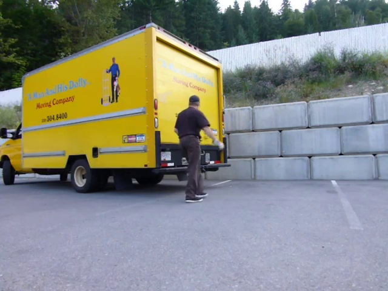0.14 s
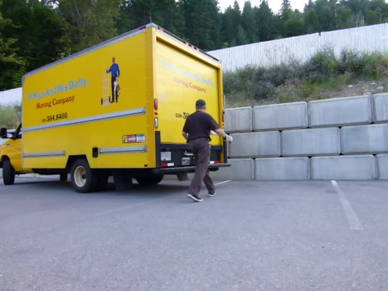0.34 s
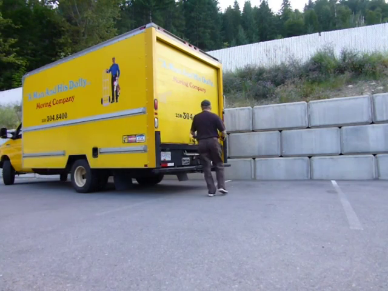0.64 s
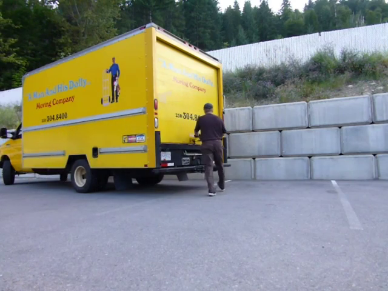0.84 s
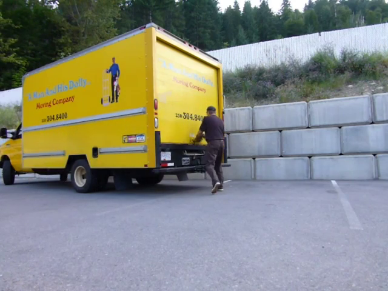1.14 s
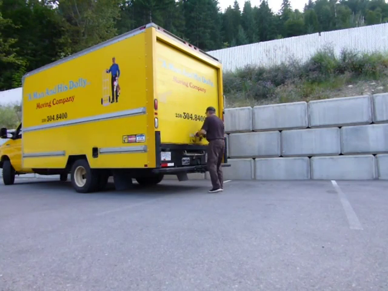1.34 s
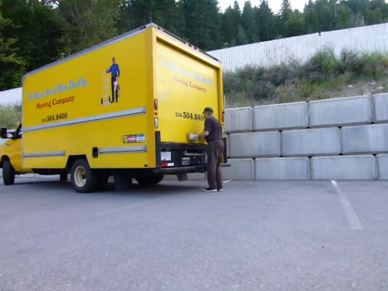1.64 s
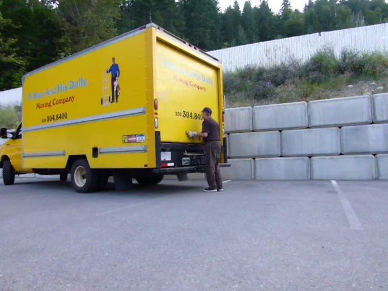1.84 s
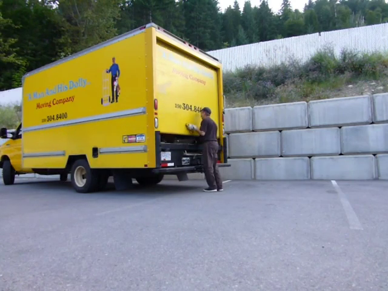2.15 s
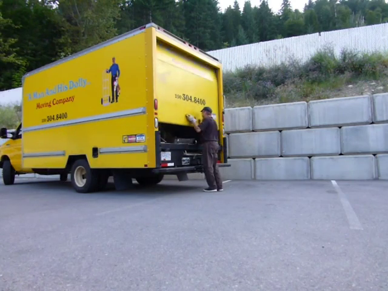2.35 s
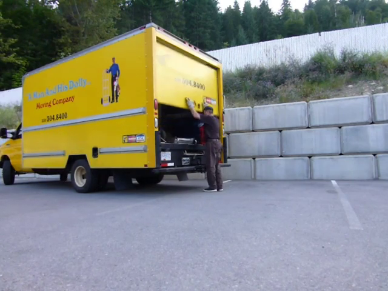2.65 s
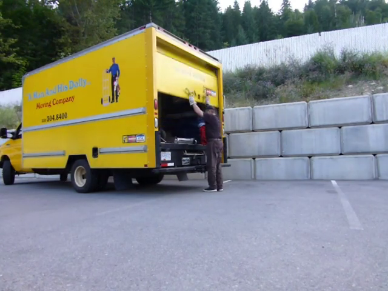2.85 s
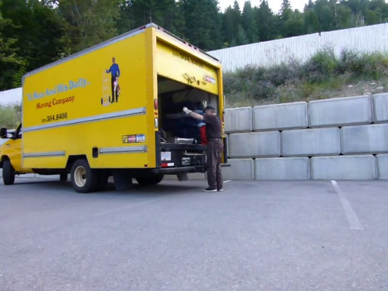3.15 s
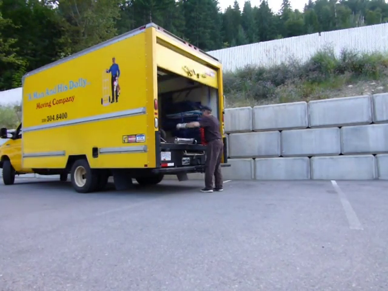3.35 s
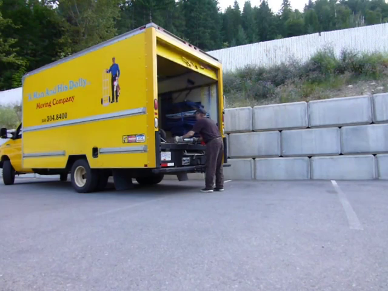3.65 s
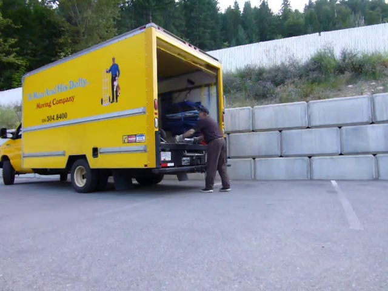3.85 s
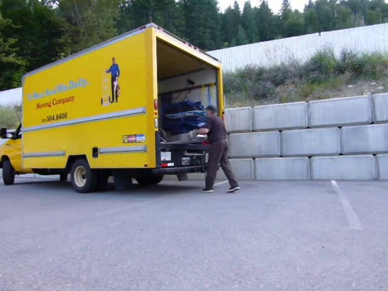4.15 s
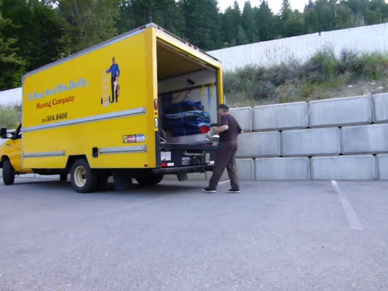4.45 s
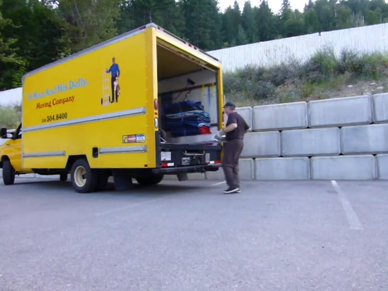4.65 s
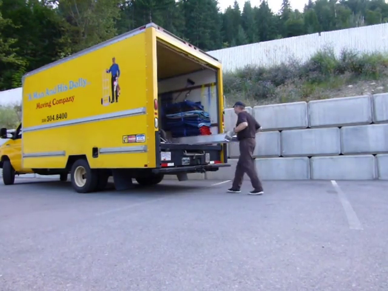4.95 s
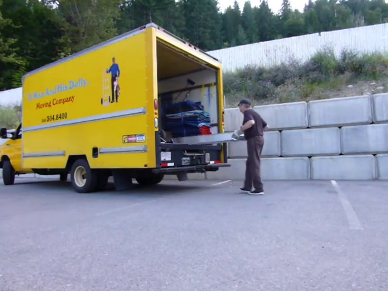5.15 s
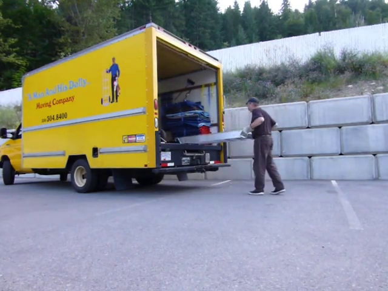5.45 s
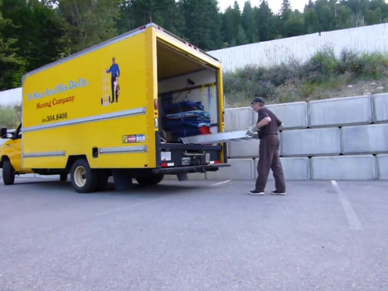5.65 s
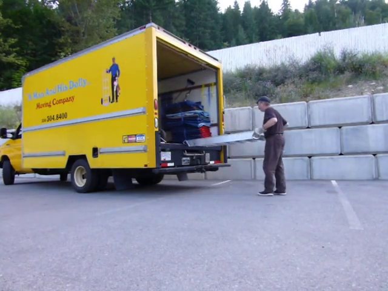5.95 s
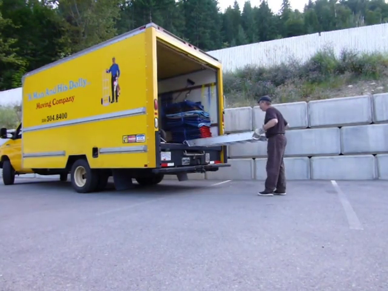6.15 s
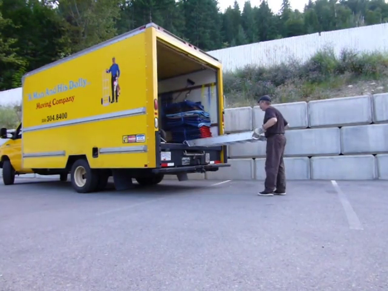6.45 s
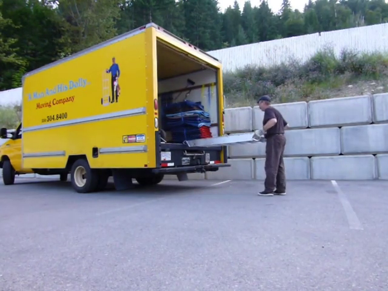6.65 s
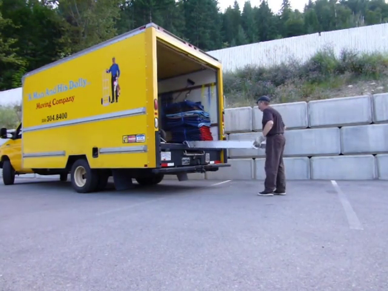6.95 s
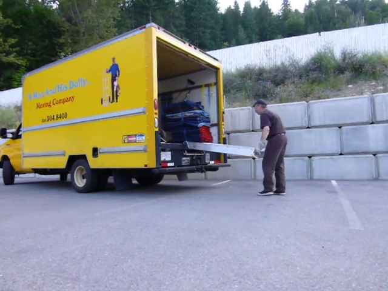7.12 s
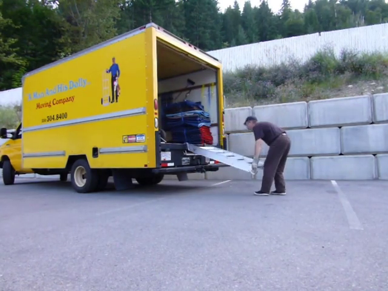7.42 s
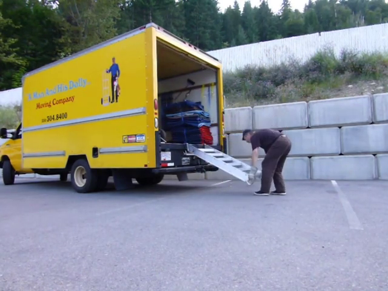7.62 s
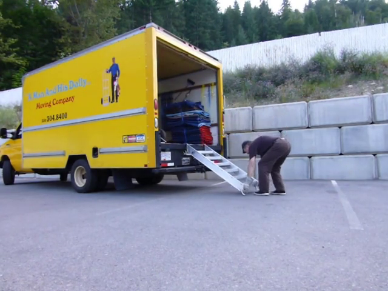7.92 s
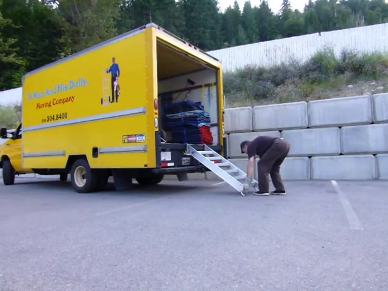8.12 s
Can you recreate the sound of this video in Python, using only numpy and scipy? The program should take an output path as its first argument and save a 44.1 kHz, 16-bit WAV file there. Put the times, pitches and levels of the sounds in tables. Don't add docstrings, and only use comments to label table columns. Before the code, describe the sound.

A steel latch clatters loose, a slatted truck door rattles up its tracks, then a metal ramp drones out, clangs hard and is set down outdoors.

```python
import sys
import numpy as np
from scipy import signal
from scipy.fft import rfft, irfft, next_fast_len
from scipy.io import wavfile

SR = 44100
rng = np.random.default_rng(int(sys.argv[2]) if len(sys.argv) > 2 else 0)


def digitize_waveform(pressure):
    field = np.atleast_2d(pressure).T
    bounded = np.clip(field, -1, 1)
    quanta = np.round(bounded * 32767).astype(np.int16)
    wavfile.write(sys.argv[1], SR, quanta)


def rack_gain(trim_db):
    fader = np.asarray(trim_db, float)
    return 10 ** (fader / 20)


N = 365148

# t/s, level/dB, weight/dB, hard edge/dB, contact time/s
RAMP_BLOWS = [(5.3433, -28.5, 7, -12, 0.012), (5.432, -17, 6.5, -16, 0.062), (5.471, -8.5, 3.5, -16, 0.034),
              (5.5518, -13.5, 5.5, -12, 0.052), (5.6051, -13.5, 8, -13, 0.014),
              (5.6193, -10, -7, -11.5, 0.014), (5.6315, -13.5, 5.5, -14, 0.015),
              (5.6494, -13, -4, -12, 0.056), (5.6995, -14, 8, -16, 0.15), (5.9292, -7.5, -1, -14.5, 0.004),
              (5.9483, -9.5, 4, -5, 0.0048), (6.0125, -13, 3, -6, 0.011), (6.0385, -17, 2.5, -8, 0.029),
              (6.5589, -21, 2, -17.5, 0.023), (6.684, -33.5, 13, -15, 0.023), (6.7192, -42, 22, -31, 0.035),
              (7.3065, -13, 3, -12.5, 0.047), (7.335, -21, 6, -12, 0.016), (7.3691, -14.5, 0.5, -7, 0.014),
              (7.3849, -14.5, -2.5, -22, 0.018), (8.096, -18.5, 5.5, -11.5, 0.02),
              (8.112, -12, -2.5, -12, 0.0069), (8.1277, -19.5, 4, -28, 0.0045)]
# t/s, speed level/dB, load on the rollers/dB
RAMP_ROLL = [(3.92, -48, 0), (3.965, -40.5, 16), (4.0, -28, 9.5), (4.03, -23.5, 5.5), (4.125, -15.5, 1.5),
             (4.18, -13, -3.5), (4.43, -21, 0.5), (4.55, -20, 0.5), (4.592, -26, -2), (4.63, -19.5, -2),
             (4.73, -27.5, -1), (4.844, -28.5, 4), (4.942, -24, 5), (5.062, -36, -3), (5.146, -37.5, -5),
             (5.206, -30, 1.5), (5.376, -31.5, -6), (5.42, -39, 3)]
# t/s, level/dB
GRIT = [
    (3.997, -37),
    (4.041, -42),
    (4.165, -48),
    (4.626, -53),
    (4.685, -45),
    (4.77, -51),
    (4.931, -46),
    (5.04, -45),
]
# landing t/s, level/dB
SCUFFS = [
    (6.555, -33),
    (7.304, -27.5),
]
# offset level/dB, share [1]
RAMP_LOWS = [(-1.5, 0.85), (1, 0.76)]
GRIT_LOWS = [(-37, 0), (-30, 0)]
# offset level/dB, share [1]
RAMP_FOLLOWS = [(-23.5, 0.85), (-23.5, 0.81), (-31.5, 0.8), (-53.5, 1)]
# f/Hz, level/dB per Hz
RAMP_COLOUR = [(29, -63), (50, -24), (144, -11), (394, -6), (652, -10.5), (829, -8.5), (981, -12),
               (1700, -17), (1970, -21), (7190, -35), (10100, -45), (15500, -94)]
# f/Hz, level/dB per Hz
HELD_COLOUR = [(35, -60), (60, -20.5), (150, -15.5), (300, -3), (550, -1.5), (1000, -5), (1600, -20),
               (2500, -25.5), (4300, -32), (6000, -41), (10000, -44), (14000, -54), (15500, -68)]
# f/Hz, t60/s
RAMP_T60 = [(100, 0.74), (300, 1), (800, 0.75), (2000, 0.54), (5000, 0.47), (12000, 0.23)]
HELD_T60 = [(200, 0.23), (1000, 0.23), (5000, 0.054)]
# f/Hz, level over the dense modes/dB, t60/s
RAMP_MODES = [(250, -16, .7), (310, -17, .6), (390, -14, .8), (580, -17, .5), (670, -19, .4),
              (810, -20, .5), (840, -20, .5), (975, -21, .4)]
HELD_MODES = [(250.5, -9, 0.32), (289, -7.5, 0.3), (316.5, -7, 0.37), (448, -12, 0.16),
              (635.7, -10.5, 0.21), (795, -12, 0.33)]

# t/s, level/dB, weight/dB, hard edge/dB
DOOR_BLOWS = [(2.1036, -16.5, 3, -12), (2.154, -22.5, -12, -5), (2.2095, -18, 4.5, -3),
              (2.4028, -25, 17, -11), (2.4454, -16.5, 3, -6), (2.4863, -18.5, 7, 1), (2.5487, -25, 2, 1),
              (2.639, -12, 3, -13), (2.6446, -7, 7.5, -21), (2.797, -10, -3, -6), (2.8152, -6.5, -15, -23),
              (2.9532, -4, 2, -10), (2.9824, -1.5, 3, -16), (3.1474, -9, -19, -11), (3.1646, -5, -6, -11),
              (3.2015, -9.5, 5.5, -6.5), (3.2675, -22, 0, 1.5), (3.4324, -8.5, -1, -10.5),
              (3.4484, -15, 2, -7), (3.5471, -9.5, -20, -11), (3.579, -18.5, -16, -2),
              (3.6127, -11, -18, -3), (3.7244, -7, -14, -2.5)]
# t/s, speed level/dB
DOOR_ROLL = [(1.95, -56), (2.17, -40), (2.29, -33.5), (2.39, -35.5), (2.53, -29), (2.65, -31), (2.84, -25),
             (3.04, -24), (3.23, -33), (3.46, -31), (3.64, -31), (3.83, -31), (4.0, -44)]
# offset level/dB, share [1]
DOOR_LOWS = [(-11.5, 1), (-1.5, 0.99)]
# offset level/dB, share [1]
DOOR_FOLLOWS = [(-29.5, 0.62), (-28.5, 0.85), (-33.5, 0.8), (-42, 0.74)]
# f/Hz, level/dB per Hz
DOOR_COLOUR = [(35, -52), (60, -11), (192, 4.5), (464, -1), (657, 0.5), (1230, -12.5), (3580, -20.5),
               (4030, -23.5), (4420, -21.5), (5320, -27), (14100, -44), (15500, -58)]
# f/Hz, t60/s
DOOR_T60 = [(200, 0.26), (1000, 0.59), (4000, 0.3), (12000, 0.35)]
# f/Hz, level over the dense modes/dB, t60/s
DOOR_MODES = [(188.4, -18, 0.65), (314, -31, 0.38), (393.2, -11, 0.36), (652, -10.5, 0.54),
              (4037, -15.5, 0.035), (4830, -11, 0.033)]

# t/s, level/dB, weight/dB, hard edge/dB
LATCH_BLOWS = [(1.063, -16.5, -7.5, 0.5), (1.0946, -11, -21, -1.5), (1.1398, -27, -20, 3),
               (1.186, -23, -13, -10), (1.2161, -11.5, -20, -12), (1.2254, -24, -25, -16),
               (1.262, -17, -9, -17), (1.297, -3, -22, -9), (1.3457, -20, -8, -4), (1.3874, -16, -15, -11),
               (1.4345, -9, 1, -5.5), (1.4474, -9, -12, -7), (1.4646, -13, -10, -3.5),
               (1.5235, -17, -17, -14), (1.5889, -10.5, -12, 0.5), (1.6044, -36, -22, 4),
               (1.6644, -14.5, -27, -2), (1.712, -9, -7, -7.5), (1.7244, -17, 1, -17),
               (1.7399, -20, 1.5, -5), (1.767, -18, -18, -5), (1.8216, -18, -20, -14),
               (1.8318, -8.5, -32, -2.5), (1.8494, -15, 5, 0), (1.921, -21.5, -20, -29)]
# t/s, level/dB
JIGGLE = [(1.04, -47), (1.07, -37), (1.3, -41), (1.6, -35), (1.9, -31.5), (2.02, -44.5)]
# offset level/dB, share [1]
LATCH_LOWS = [(0.16, 0.83), (-0.41, 0.21)]
# f/Hz, level/dB per Hz
LATCH_COLOUR = [(70, -36), (150, -8), (330, 3), (900, -5), (1480, 2), (2200, -6), (3000, -4), (3600, -12.5),
                (5500, -10), (8000, -17), (12000, -24), (15500, -58)]
# f/Hz, t60/s
LATCH_T60 = [(200, 0.29), (1000, 0.23), (4000, 0.18), (12000, 0.066)]
# f/Hz, level over the dense modes/dB, t60/s
LATCH_MODES = [(1450, -12, .04), (3000, -14, .05), (4080, -19, .1), (5600, -12, .1), (7400, -19, .1),
               (7950, -19, .09), (9050, -21, .08), (10010, -24, .08), (11200, -23, .09)]

# t/s, f/Hz,
# level/dB, t60/s
RINGS = [(1.589, 7301, -25, .2), (1.589, 7705, -24, .2), (1.742, 5600, -26, .06), (2.104, 5300, -11, .012),
         (2.104, 6200, -15, .01), (2.157, 5600, -28, .015), (1.6644, 7700, -27, .06),
         (4.176, 5170, -24, .06), (4.156, 4670, -29, .04), (2.9835, 1500, -7, .012), (3.613, 3910, -30, .1),
         (3.724, 3910, -20, .12), (3.724, 5400, -24, .1), (4.765, 4900, -42, .05)]
# t/s, f/Hz, width/Hz, level/dB,
# t60/s
SQUEAKS = [(0.866, 270, 130, -29, .25), (4.155, 5210, 140, -29, .5), (4.165, 4950, 250, -33, .3),
           (1.435, 350, 120, -21, .3), (1.09, 270, 80, -31, .3), (4.628, 3950, 220, -36, .38),
           (3.57, 14300, 700, -50, .9), (3.98, 14300, 700, -52, 1.2), (2.755, 700, 50, -16, .3),
           (7.235, 650, 120, -38, .4), (8.108, 860, 240, -12, .36), (6.01, 850, 110, -17, .7),
           (4.865, 300, 60, -18, .3), (4.93, 310, 60, -15, .3), (3.985, 305, 40, -16, .5),
           (4.07, 285, 50, -17, .5), (4.38, 330, 30, -20, .6), (4.53, 420, 40, -17, .35),
           (0.866, 750, 400, -39.5, .12), (5.436, 500, 500, -25, .3), (6.682, 380, 150, -29, .4),
           (7.34, 600, 150, -17, .5)]
# t/s, f/Hz, level/dB
CATCH_KNOCKS = [(1.063, 1410.0, -26), (1.063, 5530.0, -17), (1.0946, 4640.0, -18), (1.0946, 5160.0, -17),
                (1.0946, 5560.0, -13), (1.0946, 6060.0, -20.0), (1.2161, 2750.0, -20),
                (1.2254, 1360.0, -21), (1.2254, 3280.0, -30), (1.262, 3050.0, -25.0), (1.262, 4530.0, -27),
                (1.262, 5570.0, -20), (1.297, 1300.0, -6.5), (1.297, 4090.0, -10), (1.297, 4750.0, -14),
                (1.297, 6080.0, -15), (1.3874, 2880.0, -27), (1.4345, 1530.0, -12), (1.4345, 3880.0, -19),
                (1.4345, 5640.0, -25.0), (1.4345, 6380.0, -25.0), (1.4646, 1510.0, -24),
                (1.4646, 2810.0, -22), (1.4646, 4680.0, -34), (1.5889, 1500.0, -12), (1.5889, 2900.0, -22),
                (1.5889, 4820.0, -29), (1.6044, 3430.0, -24), (1.6044, 5710.0, -24), (1.6644, 1660.0, -25),
                (1.6644, 6470.0, -30.0), (1.712, 1510.0, -13), (1.712, 4010.0, -23.0), (1.712, 5590.0, -30),
                (1.712, 6380.0, -35), (1.7244, 2770.0, -28.0), (1.7244, 4030.0, -25),
                (1.767, 1750.0, -19.5), (1.8216, 1480.0, -19.0), (1.8216, 3080.0, -31),
                (1.8216, 4110.0, -31.0), (1.8318, 1550.0, -15), (1.8318, 3130.0, -12.5),
                (1.8318, 4120.0, -14.5), (1.8318, 6320.0, -26), (1.8494, 2900.0, -25.5),
                (1.8494, 4150.0, -24), (1.8494, 6290.0, -34.5), (1.8494, 6810.0, -33.5),
                (1.921, 2820.0, -24.5)]
# t/s, f/Hz, level/dB
PIN_TINKS = [(1.063, 9100, -28), (1.063, 10010.0, -33.0), (1.063, 11200.0, -39), (1.0946, 9050.0, -28),
             (1.0946, 11190.0, -31), (1.0946, 15090.0, -44.0), (1.2161, 11540.0, -51.0), (1.297, 7250, -21),
             (1.297, 9070.0, -40), (1.297, 10000.0, -34), (1.3874, 10850.0, -44), (1.3874, 13980.0, -50),
             (1.3874, 15260.0, -55.0), (1.4345, 8000, -24), (1.4345, 10900.0, -33), (1.4345, 15020.0, -46),
             (1.4646, 7430.0, -28), (1.4646, 8050.0, -37.0), (1.4646, 10070.0, -42), (1.5889, 14310.0, -30),
             (1.6644, 10650.0, -36), (1.712, 7430.0, -39.0), (1.767, 13100.0, -44), (1.767, 14400, -36),
             (1.767, 15600.0, -55.0), (1.8318, 8560.0, -35), (1.8494, 7260, -27), (1.8494, 11460.0, -47)]
# t/s, f/Hz, level/dB
ROLLER_TICKS = [(2.213, 2270.0, -28), (2.45, 3980.0, -26), (2.462, 5300, -25), (2.489, 4060.0, -33.0),
                (2.492, 4800, -32), (2.546, 3530.0, -28), (2.546, 5320.0, -33.0), (2.612, 4120.0, -32.0),
                (2.624, 3450, -26), (2.639, 5220, -29), (2.645, 6060.0, -27), (2.78, 4130.0, -32.0),
                (2.792, 5070, -22), (2.801, 2400, -19), (2.801, 4720.0, -16), (2.843, 3980.0, -28),
                (2.861, 1800.0, -27), (2.927, 3830.0, -25.0), (2.93, 4040, -28.0), (2.939, 7030.0, -27),
                (2.957, 4830.0, -30.0), (2.978, 3880.0, -22), (2.981, 2350.0, -18.0), (2.984, 6100, -21),
                (2.987, 1360, -14.5), (2.996, 1690, -18), (2.996, 4900, -19), (3.152, 2370.0, -18),
                (3.152, 5390.0, -23), (3.161, 2780, -17), (3.185, 4020, -25), (3.2, 3190.0, -25.0),
                (3.221, 2760.0, -23), (3.242, 4100, -32.0), (3.263, 5330.0, -31), (3.38, 2970.0, -30.0),
                (3.431, 5970.0, -30.0), (3.47, 4040.0, -34), (3.545, 6150.0, -38), (3.548, 8560.0, -26)]
# t/s, f/Hz, level/dB
GRIT_FLECKS = [(3.992, 7500, -35), (4.0, 13960.0, -47.0), (4.004, 9000.0, -37.0), (4.08, 3910.0, -29.5),
               (4.14, 13860.0, -51.0), (4.168, 10730.0, -36), (4.18, 13810.0, -53.0),
               (4.212, 9130.0, -46.0), (4.272, 3920.0, -30), (4.336, 8900, -44), (4.348, 10820.0, -50.0),
               (4.532, 11530.0, -51), (4.628, 3940, -30), (4.628, 8000.0, -39), (4.672, 3890.0, -39),
               (4.832, 9880.0, -53.0)]
# t/s, f/Hz, level/dB
PLATE_CLANGS = [(5.485, 820, -10.5), (5.495, 576, -17), (5.51, 904, -21), (5.525, 1050, -20),
                (5.53, 766, -16.0), (5.56, 397, -7.5), (5.565, 1200.0, -17), (5.575, 470.0, -10.0),
                (5.59, 1580, -19), (5.6, 574, -16.0), (5.6, 1400, -18), (5.615, 1320.0, -24),
                (5.65, 810, -22), (5.66, 593, -17), (5.68, 1510, -18), (5.945, 1160, -16.5),
                (5.97, 730, -27), (5.99, 920.0, -13.5), (6.02, 829, -12.5), (6.11, 830, -17)]

# f/Hz, level/dB per Hz
TRAFFIC_COLOUR = [(22, -14.5), (35, -15), (60, -41), (120, -2.5), (250, -2), (500, -4.5), (800, -7.5),
                  (1600, -18.5), (2500, -22.5), (3300, -29.5), (4900, -24.5), (6300, -30.5), (10000, -35),
                  (13200, -41), (14500, -61)]
# t/s, level/dB
TRAFFIC_LEVEL = [(0, -42), (1.0, -41), (5.3, -37.5), (6.3, -45.5), (7.15, -47), (7.35, -42), (7.9, -45.5),
                 (8.28, -45)]
# f/Hz, side re mid level/dB
TRUCK_WIDTH = [(60, -14), (150, -26), (380, -29), (950, -17), (2380, -13), (5980, -14), (15000, -14)]
TRAFFIC_WIDTH = [(30, -12), (70, -27), (180, -35), (550, -12), (1650, -2.5), (4970, -4.5), (15000, 1)]
# f/Hz, left re right level/dB
LEAN = [(60, 0), (240, -0.5), (950, -1), (3770, 0), (15000, 4)]
SPLIT_HZ = (450, 1200, 4500)
EDGES_HZ = 22 * 2 ** np.arange(0, 9.7, 1 / 3)
SPOTS, NEAR = 6, 3


def rms_one(x):
    return x / np.sqrt(np.mean(x ** 2) + 1e-20)


def at_hz(points, hz):
    table_hz, values = np.array(points).T
    return np.interp(np.log(hz), np.log(table_hz), values)


def controls(rows, outside_db=-400):
    s, *columns = np.transpose(rows)
    t = np.arange(N) / SR
    return [np.interp(t, s, c, left=outside_db, right=outside_db) for c in columns]


def in_time(rows):
    return rack_gain(np.array(controls(rows, outside_db=-200)))


def follow(control_db, rule):
    return rack_gain(np.array([offset_db + share * control_db for offset_db, share in rule]))


def drift(rate_hz):
    knots = rng.standard_normal(int(N / SR * rate_hz) + 2)
    return rms_one(np.interp(np.arange(N) / SR * rate_hz, np.arange(len(knots)), knots))


def onset(t, rate):
    return 1 - np.exp(-rate * t)


def bands(size, colour, width):
    white = rng.standard_normal((2, 2, size))
    for k, (low, high) in enumerate(zip(EDGES_HZ, EDGES_HZ[1:])):
        band_pass = signal.butter(2, [low, high], "band", fs=SR, output="sos")
        mid, side = signal.sosfilt(band_pass, white[k % 2])
        hz = np.sqrt(low * high)
        lean = rack_gain(at_hz(LEAN, hz) / 2 * np.array([[1], [-1]]))
        stereo = mid + rack_gain(at_hz(width, hz)) * side * [[1], [-1]]
        yield hz, rack_gain(at_hz(colour, hz)) * lean * stereo


def body(colour, decays, modes, crack_db, crack_s, seconds):
    size = round(seconds * SR)
    t = np.arange(size) / SR
    parts = np.zeros((4, 2, SPOTS, size))
    for hz, band in bands(size * SPOTS, colour, TRUCK_WIDTH):
        dying = rack_gain(-60 * t / at_hz(decays, hz)) + rack_gain(crack_db - 60 * t / crack_s)
        building = onset(t, 2 * hz) ** 2
        parts[np.searchsorted(SPLIT_HZ, hz)] += band.reshape(2, SPOTS, size) * building * dying
    parts /= np.sqrt(np.sum(parts ** 2, axis=(1, 2, 3), keepdims=True) / 2 / SPOTS)
    for hz, level_db, t60 in modes:
        mode = np.sin(2 * np.pi * hz * t) * rack_gain(-60 * t / t60) * onset(t, 2 * hz)
        shape = rng.standard_normal((SPOTS, 1))
        mode = mode / np.sqrt(np.sum(mode ** 2))
        parts[np.searchsorted(SPLIT_HZ, hz)] += rack_gain(level_db) * shape * mode
    return parts


def chatter(per_s, spread_db=3.0):
    sizes = rack_gain(spread_db * np.minimum(rng.exponential(1, N), 4)) * rng.choice([-1, 1], N)
    return rms_one(sizes * (rng.random(N) < per_s / SR))


def blows(table, parts, lows, gain_db, first, per_s, contact_s=.003):
    out = np.zeros((2, N + 2 * SR))
    bounces = chatter(per_s)
    for k, (s, level_db, weight_db, edge_db, *own) in enumerate(table):
        length = max(own[0] if own else contact_s, .001)
        i, t = round(s * SR), np.arange(round(3 * length * SR)) / SR
        flurry = bounces[i:i + len(t)] * np.exp(-t / length)
        flurry[0] = first * np.sqrt(np.sum(flurry ** 2) + 1e-9)
        near = parts[:, :, (k + np.arange(NEAR)) % SPOTS]
        range_gains = np.append(follow(weight_db, lows), [1, rack_gain(edge_db)])
        answer = np.tensordot(range_gains, near, 1)
        turn = np.cumsum(flurry != 0) % NEAR
        dealt = flurry * (turn == np.arange(NEAR)[:, None])
        dealt = dealt / np.sqrt(np.sum(flurry ** 2))
        struck = signal.fftconvolve(dealt[None], answer, axes=2).sum(axis=1)
        out[:, i:i + struck.shape[1]] += rack_gain(gain_db + level_db) * struck
    return out[:, :N]


def roll(gains, contacts, parts):
    busy = np.flatnonzero(gains.max(axis=0) > 1e-9)
    span = slice(busy[0], busy[-1])
    spot = rng.integers(0, SPOTS, N)[span]
    dealt = contacts[span] * (spot == np.arange(SPOTS)[:, None])
    size = next_fast_len(dealt.shape[1] + parts.shape[-1])
    spectrum = 0
    for gain, part in zip(gains, parts):
        spectrum = spectrum + np.sum(rfft(gain[span] * dealt, size) * rfft(part, size), axis=1)
    out = np.zeros((2, N + size))
    out[:, busy[0]:busy[0] + size] = irfft(spectrum, size)
    return out[:, :N]


def ramp():
    held = body(HELD_COLOUR, HELD_T60, HELD_MODES, crack_db=-15.0, crack_s=0.083, seconds=.35)
    free = body(RAMP_COLOUR, RAMP_T60, RAMP_MODES, crack_db=9.0, crack_s=0.053, seconds=.7)
    speed_db, load_db = controls(RAMP_ROLL)
    gains = follow(speed_db + 23.5, RAMP_FOLLOWS)
    gains[0] *= rack_gain(load_db)
    drone = roll(gains, chatter(2500) * rack_gain(1.2 * drift(40)), held)
    catches = [(s, level_db, 0, -3.5) for s, level_db in GRIT]
    grit = blows(catches, held, GRIT_LOWS, gain_db=35.5, first=0.28, per_s=2800, contact_s=0.097)
    scuff_gains = scuffs() * rack_gain(np.array([[-7], [0.3], [-5], [-16]]))
    scuff = roll(scuff_gains, chatter(2200, spread_db=-1.0), free)
    return drone + grit + scuff + blows(RAMP_BLOWS, free, RAMP_LOWS, gain_db=24.0, first=0.4, per_s=2200)


def scuffs():
    rise_db_per_s, scuff_s = 448.5, .11
    swell = np.zeros(N)
    for landing_s, level_db in SCUFFS:
        ahead = landing_s - np.arange(N) / SR
        swell += rack_gain(level_db - rise_db_per_s * np.abs(ahead)) * (ahead > 0) * (ahead < scuff_s)
    return swell


def door():
    slats = body(DOOR_COLOUR, DOOR_T60, DOOR_MODES, crack_db=15.0, crack_s=0.011, seconds=.25)
    shaking = rack_gain(np.array([depth_db * drift(35) for depth_db in (0.92, 1.8, 3.4, 2.8)]))
    speed_db, = controls(DOOR_ROLL)
    rolling = roll(follow(speed_db + 30.5, DOOR_FOLLOWS) * shaking, chatter(1000), slats)
    return rolling + blows(DOOR_BLOWS, slats, DOOR_LOWS, gain_db=13.0, first=0.48, per_s=1600,
                           contact_s=0.0064)


def latch():
    steel = body(LATCH_COLOUR, LATCH_T60, LATCH_MODES, crack_db=9.5, crack_s=0.012, seconds=.4)
    jiggle_gains = in_time(JIGGLE) * rack_gain(np.array([[-2.5], [-1.5], [-1.5], [-8]]))
    jiggle = roll(jiggle_gains, chatter(900), steel)
    return jiggle + blows(LATCH_BLOWS, steel, LATCH_LOWS, gain_db=17.5, first=1.66, per_s=1500,
                          contact_s=0.0046)


def touches():
    latch_parts = touched(CATCH_KNOCKS, t60=.03) + touched(PIN_TINKS, t60=.07)
    rolling_parts = touched(ROLLER_TICKS, t60=.024) + touched(GRIT_FLECKS, t60=.04)
    return latch_parts + rolling_parts + touched(PLATE_CLANGS, t60=.12)


def touched(table, t60):
    out, t = np.zeros((2, N + SR)), np.arange(SR // 5) / SR
    chances = rng.uniform(-1.2, 1, (len(table), 2))
    for (s, hz, level_db), (lean, apart) in zip(table, chances):
        twin_hz = hz * (1 + .03 * apart)
        pair = np.sin(2 * np.pi * hz * t) + .6 * np.sin(2 * np.pi * twin_hz * t)
        ring = pair * rack_gain(level_db - 60 * t / t60) * onset(t, 3000)
        sides = rack_gain(2 * lean * np.array([[.5], [-.5]]))
        out[:, round(s * SR):][:, :len(t)] += ring * sides
    return out[:, :N]


def small_parts():
    out, t = np.zeros(N + SR), np.arange(SR) / SR
    for s, hz, level_db, t60 in RINGS:
        ring = np.sin(2 * np.pi * hz * t) * rack_gain(level_db - 60 * t / t60)
        out[round(s * SR):][:SR] += ring * onset(t, hz / 0.28)
    for s, hz, width_hz, level_db, t60 in SQUEAKS:
        edges = [hz - width_hz / 2, hz + width_hz / 2]
        narrow = signal.butter(2, edges, "band", fs=SR, output="sos")
        rough = rms_one(signal.sosfilt(narrow, rng.standard_normal(SR)))
        out[round(s * SR):][:SR] += rough * rack_gain(level_db - 60 * t / t60) * onset(t, hz / 1.7)
    return out[:N]


def traffic():
    together = drift(2.17)
    hum = np.zeros((2, N))
    for hz, band in bands(N, TRAFFIC_COLOUR, TRAFFIC_WIDTH):
        hum += band * rack_gain(0.84 * together + .7 * drift(9.3))
    return rms_one(hum) * in_time(TRAFFIC_LEVEL)


def scene():
    truck = ramp() + door() + latch() + touches() + small_parts()
    no_deep_bass = signal.butter(3, 90, "high", fs=SR, output="sos")
    return signal.sosfilt(no_deep_bass, truck) + traffic()


def roll_off(x):
    return signal.sosfilt(signal.butter(12, 15970, fs=SR, output="sos"), x)


def record(dry):
    dulled = signal.sosfilt(signal.butter(8, 15000, fs=SR, output="sos"), dry)
    rounded = 1.3 * np.tanh(dulled / 1.3) - .0034
    return roll_off(rounded)


dry = scene()
out = record(dry)
digitize_waveform(out)
```